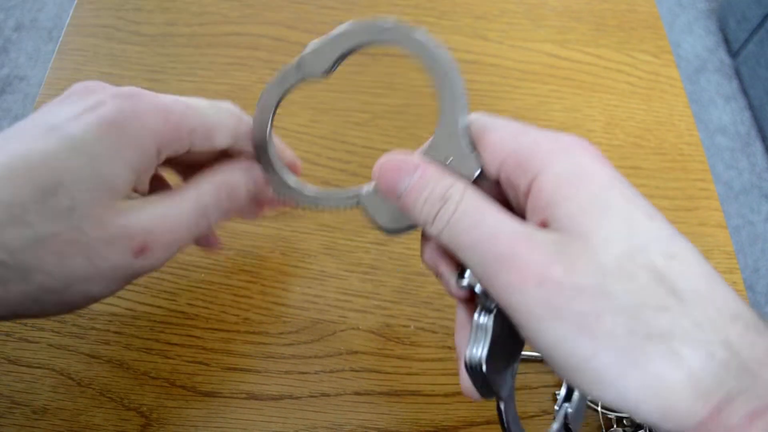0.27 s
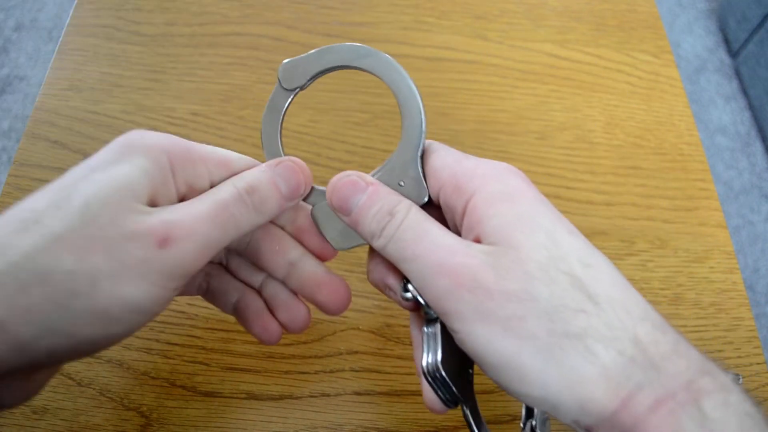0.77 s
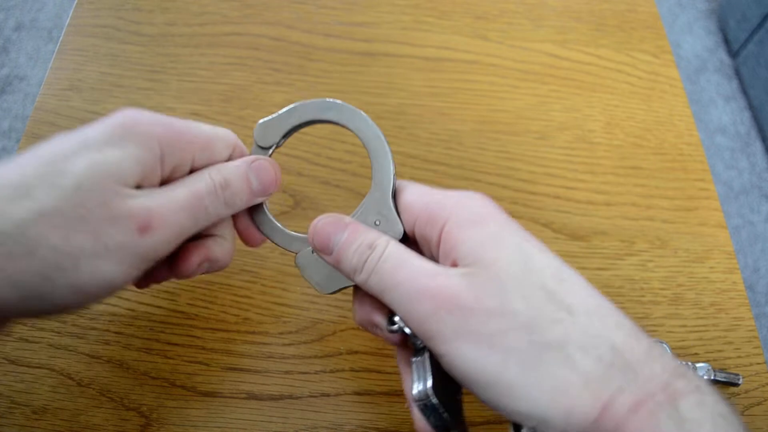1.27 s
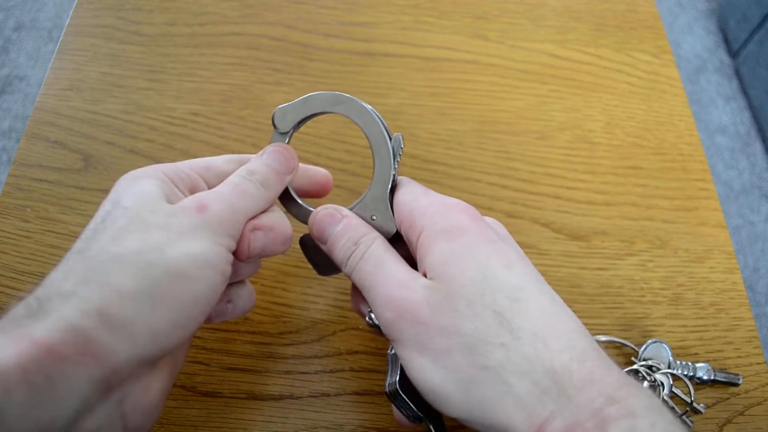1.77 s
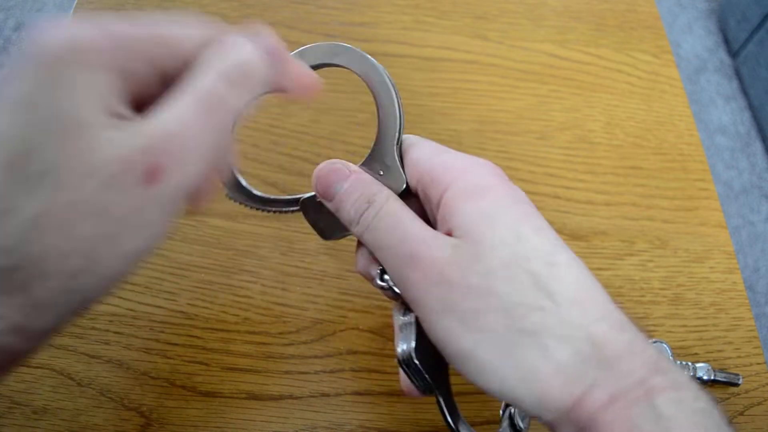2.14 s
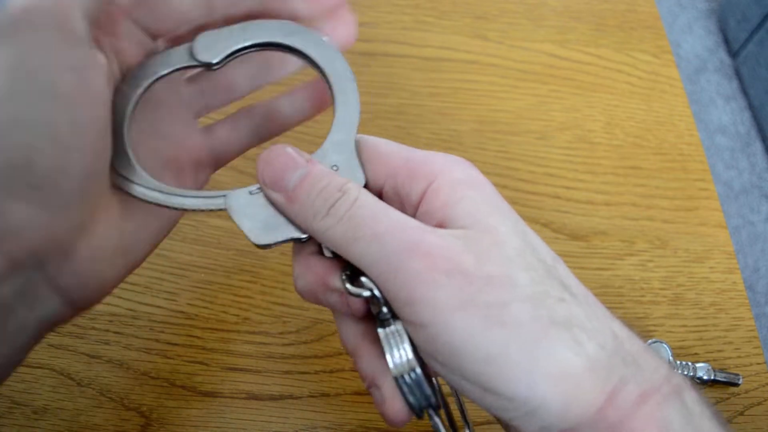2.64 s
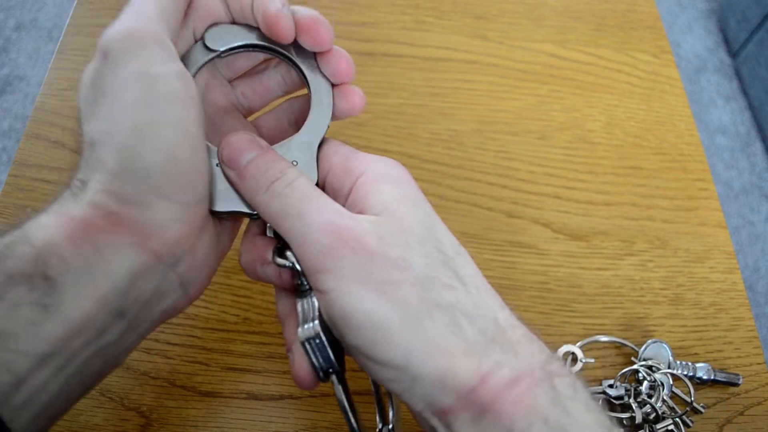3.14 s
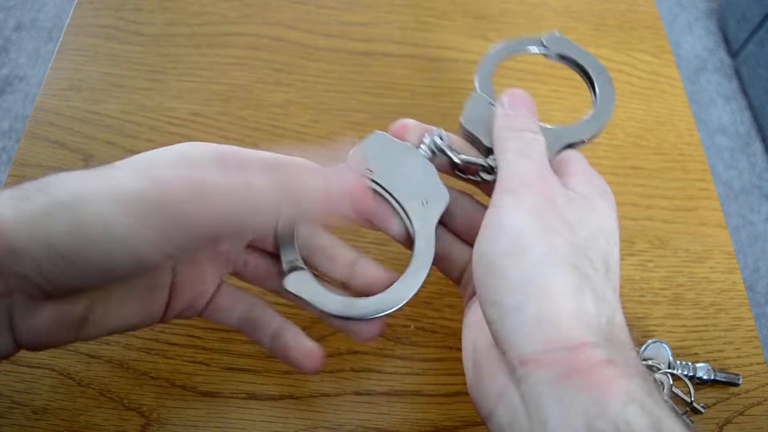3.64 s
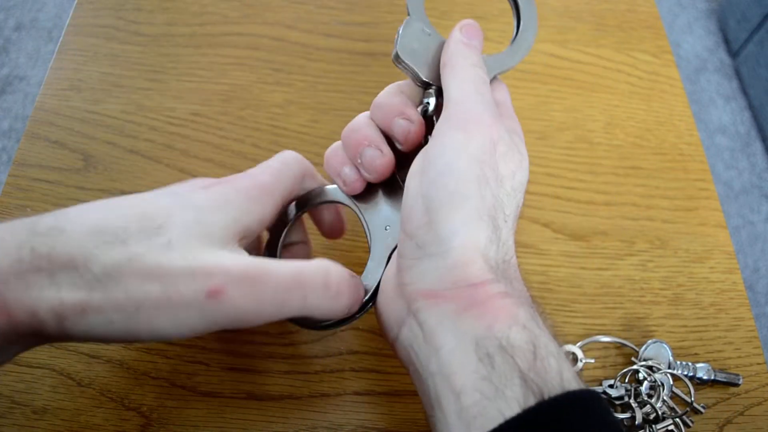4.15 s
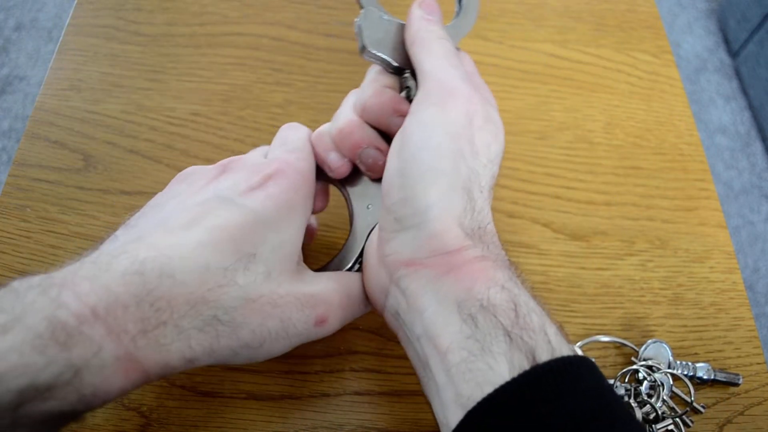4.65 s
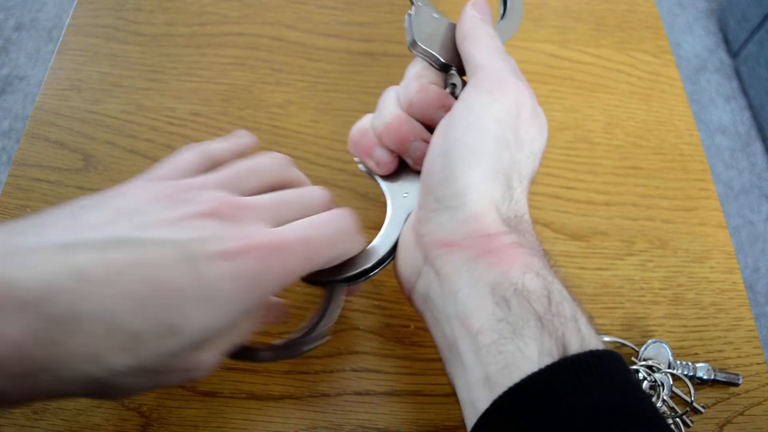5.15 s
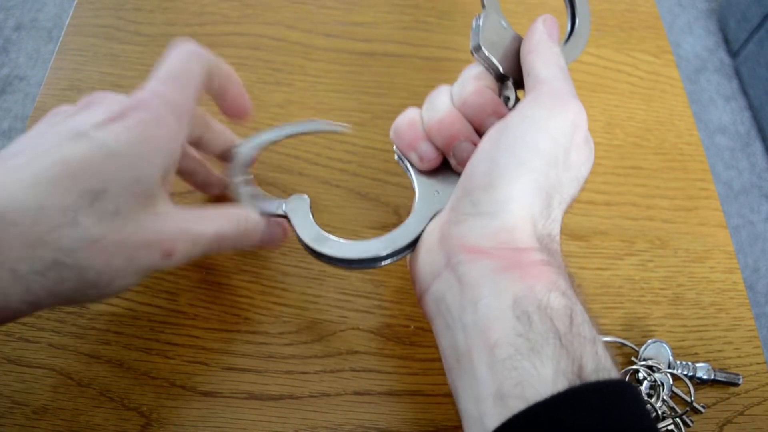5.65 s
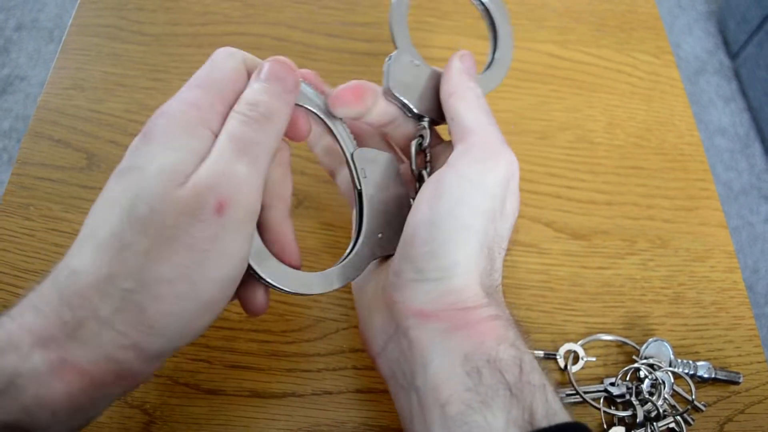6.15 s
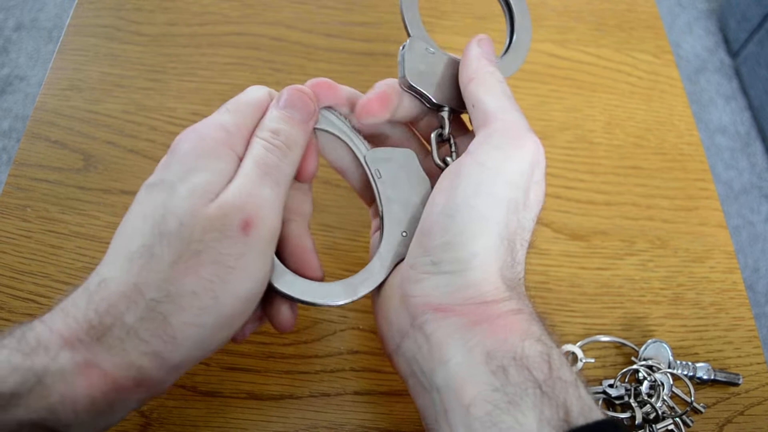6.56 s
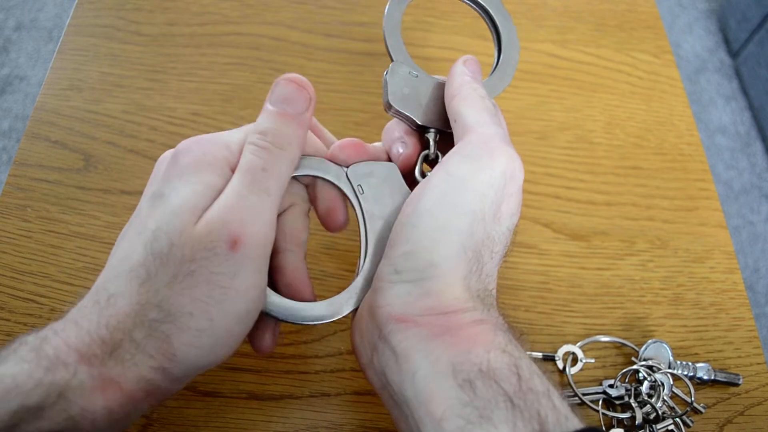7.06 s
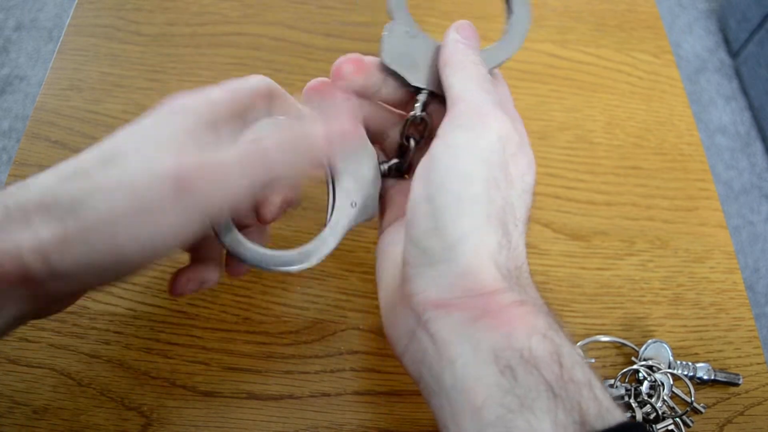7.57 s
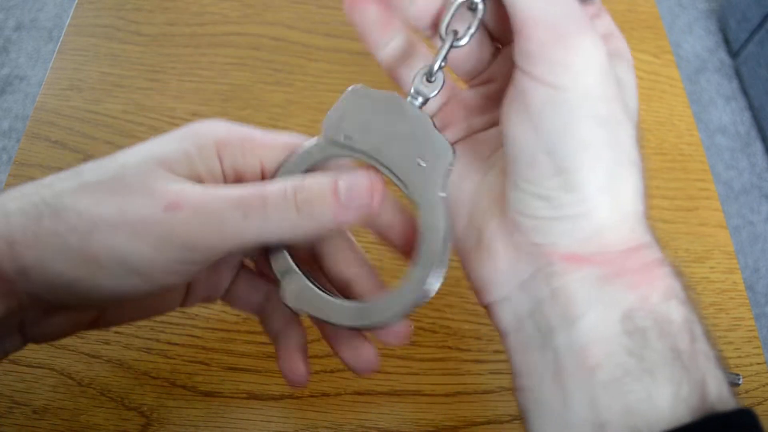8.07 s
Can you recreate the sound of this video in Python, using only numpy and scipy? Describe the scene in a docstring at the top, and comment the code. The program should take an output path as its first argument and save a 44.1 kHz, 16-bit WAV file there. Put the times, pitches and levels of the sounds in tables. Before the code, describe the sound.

A short metallic ring opens, followed by a rapid burst of ratchet clicks as a handcuff closes. Scattered clicks and a hard knock on a wooden table lead to another quick run, then two slower, uneven ones. Small clinks and chain jingles fill the gaps and finish the sound. Everything is close to the microphone, each click leaving a short tail in a quiet room with faint background noise.

```python
"""Steel handcuffs, handled close to a small microphone in a quiet, furnished room.
First the open bow hits its stop and rings briefly. From 0.6 s the pawl snaps over the bow's teeth,
in quick runs and single clicks, while links and bow clink in the hands. The wooden table takes one
hard knock at 1.9 s and four soft ones around 5.7 s. The last tooth falls at 7.1 s, then only clinks
remain. Throughout, the room answers every click with a short tail over a faint hush."""
import sys
import numpy as np
from scipy import signal
from scipy.fft import rfft, irfft
from scipy.io import wavfile
from scipy.ndimage import uniform_filter1d

SR = 44100
rng = np.random.default_rng(int(sys.argv[2]) if len(sys.argv) > 2 else 0)


def file_out(sig):
    """Save sig as 16-bit WAV at sys.argv[1]."""
    # one column per channel
    cols = np.atleast_2d(sig).T
    # limit, then scale
    lim = np.clip(cols, -1, 1)
    pcm = np.round(lim * 32767).astype(np.int16)
    wavfile.write(sys.argv[1], SR, pcm)


N = 366912

# links and bow touch: (time [s], level [dB], pitch of the part that rings most [Hz])
TOUCHES = [(0.1168, -29, 9600), (0.3362, -30, 5000), (0.3445, -33.5, 4370), (0.979, -33, 10100),
           (0.994, -34, 9100), (1.089, -48.5, 9800), (1.105, -26.5, 8250), (1.1105, -22.5, 8600),
           (1.28, -51, 9030), (1.8857, -17.5, 5000), (1.9253, -19, 9500), (2.0344, -27, 8630),
           (2.4089, -34, 4370), (2.654, -35, 10100), (2.709, -37.5, 4540), (2.754, -33.5, 9540),
           (3.2943, -21, 7760), (3.317, -31.5, 9600), (3.327, -37, 1900), (3.3618, -36, 4430),
           (3.386, -45, 6600), (3.397, -45, 4180), (3.435, -38, 9300), (3.449, -42, 3230),
           (3.536, -55, 4150), (3.56, -48, 4100), (3.5745, -39, 8780), (3.586, -23.5, 8600),
           (3.6065, -39, 9300), (3.615, -42, 9200), (3.696, -50, 9400), (3.729, -60, 6300),
           (3.7424, -28, 6560), (3.788, -45, 3180), (3.81, -41, 5600), (3.826, -30.5, 9050),
           (3.842, -45, 5600), (4.02, -39, 9110), (4.3974, -42, 8460), (5.181, -42, 8670),
           (5.227, -42, 8300), (5.239, -31.5, 8200), (5.256, -41, 8700), (5.4797, -34, 7560),
           (5.637, -47.5, 7340), (5.688, -15.5, 9360), (5.9086, -22, 9380), (5.9124, -20, 9370),
           (6.051, -44, 2900), (7.3507, -24, 10100), (7.448, -50, 9450), (7.477, -31, 10200),
           (7.488, -34.5, 10100), (7.532, -45, 9150), (7.6113, -32, 8650), (7.6425, -44, 10100),
           (7.6588, -42, 9070), (7.7513, -41, 8700), (7.7643, -45, 4180), (7.8052, -33.5, 4060),
           (7.897, -46, 9750), (7.934, -52, 9000), (7.98, -47.5, 7270), (8.0167, -53, 3150),
           (8.063, -55, 7100), (8.1544, -37.5, 1640), (8.228, -50, 3700), (8.284, -56.5, 9100)]
# modes of the cuff, damped by the hand: (frequency [Hz], width [Hz], level [dB])
CUFF_MODES = [(540, 1240, -3.5), (1160, 750, 2), (2334, 1185, -5.5), (3500, 399, -1.5), (3947, 468, 0),
              (5670, 1800, 0.5), (7240, 1910, -1.5), (8764, 410, 1), (9630, 520, 6), (10100, 2000, -2.5),
              (12700, 210, 1)]
# modes of the chain links, which ring on: (frequency [Hz], width [Hz], level [dB])
LINK_MODES = [(3230, 60, 6), (4180, 45, 8), (6590, 60, 11)]
BOW_STOP_S = 0.0772


def gain_of(db):
    """Decibels to amplitude."""
    return 10 ** (np.asarray(db) / 20)


def curve_at(points, hz):
    """Straight lines between points on a log-frequency axis."""
    point_hz, value = np.transpose(points)
    return np.interp(np.log(hz + 1), np.log(point_hz + 1), value)


def place(mix, start_s, db, sound):
    """Adds a sound so that the loudest millisecond of its first row has the given level."""
    part = mix[..., round(start_s * SR):][..., :sound.shape[-1]]
    loudest = np.sqrt(2 * uniform_filter1d(np.atleast_2d(sound)[0] ** 2, size=40).max())
    part += gain_of(db) * sound[..., :part.shape[-1]] / loudest


def chatter(noise, hold_s, t60_s, snap):
    """A hard first contact, then a few milliseconds of tiny rebounds, too light to stir the bass."""
    t = np.arange(len(noise)) / SR
    rebounds = noise - 0.3 * uniform_filter1d(noise, size=16)
    drive = rebounds * gain_of(-60 * np.maximum(t - hold_s, 0) / t60_s) * np.minimum(t / 0.001, 1)
    drive[12] -= snap
    return drive


def ring(drive, hz, width, db, steady=0):
    """A force drives a set of resonances; with steady near 1, each takes its usual share of it."""
    bin_hz, force = np.fft.rfftfreq(len(drive), 1 / SR)[:, None], rfft(drive)[:, None]
    modes = (-1) ** np.arange(len(hz)) * gain_of(db) * width / (width + 2j * (bin_hz - hz))
    excitation = np.linalg.norm(force * modes, axis=0) / np.linalg.norm(modes, axis=0)
    return irfft((force * modes / excitation ** steady).sum(axis=1), len(drive))


def strike(drive, near_modes, room_modes, steady=0):
    """Struck steel in two rows: toward the microphone, and a more even blend that fills the room."""
    near = ring(drive, *near_modes, steady)
    hz, width, db = room_modes
    even = ring(signal.unit_impulse(len(drive)), hz, 1.35 * width, db)  # modes widen toward the room
    even *= np.linalg.norm(near) / np.linalg.norm(even)
    return np.array([near, np.sqrt(0.8) * even + np.sqrt(0.2) * near])


def hush():
    """The steady background noise of room and microphone."""
    # noise spectrum: (frequency [Hz], relative density [dB])
    noise_colour = [(20, -20.5), (60, -8), (120, -2.5), (200, -1), (450, 0.5), (1250, -1.5), (1600, -6.5),
                    (2300, -10.5), (2750, -7), (3200, -14), (4700, -13.5), (6300, -22.5), (11000, -30.5)]
    colour = gain_of(curve_at(noise_colour, np.fft.rfftfreq(N, 1 / SR)))
    noise = irfft(rfft(rng.standard_normal(N)) * colour, N)
    return gain_of(-63) * noise / noise.std()


def room(sound):
    """A near wall's echo and a tail of scattered reflections, each band dying at its own speed."""
    # the near wall: (delay [s], level [dB])
    wall_echoes = [(0.012, -30)]
    # reverberation time: (frequency [Hz], t60 [s])
    decay_times = [(300, 0.42), (1300, 0.61), (3000, 0.38), (5000, .38), (9200, 0.34)]
    # colour of the tail: (frequency [Hz], relative level [dB])
    tail_colour = [(300, -14.5), (1500, -11), (2700, 0), (3700, 1.5), (7400, -1), (9500, -5.5), (11000, -1)]
    taps, grid = np.zeros((3, SR)), np.arange(240, SR - 20, 12)
    arrivals = grid + rng.integers(0, 12, (3, len(grid)))
    np.put_along_axis(taps, arrivals, rng.choice([-1., 1.], arrivals.shape), 1)
    hz, t, bands = signal.stft(taps, SR, nperseg=128)
    band_db = curve_at(tail_colour, hz)[:, None] - 60 * t / curve_at(decay_times, hz)[:, None]
    tails = signal.istft(bands * gain_of(band_db), SR, nperseg=128)[1]
    tails *= gain_of(-14.5) / np.linalg.norm(tails, axis=1, keepdims=True)
    for delay_s, db in wall_echoes:
        tails[:, round(delay_s * SR)] += gain_of(db)
    # the hands keep moving, so the paths to the walls change: three tails crossfade at 6 Hz
    turn = 2 * np.pi * (np.arange(N) * 6.0 / SR + np.arange(3)[:, None] / 3)
    crossfade = np.sqrt((1 + np.cos(turn)) / 3)
    return signal.fftconvolve(sound * crossfade, tails, axes=1)[:, :N].sum(axis=0)


def table_knocks():
    """Blows ring the wooden table top; soft ones rise slowly and reach only its lowest modes."""
    # blows on the table: (time [s], level [dB], hardness as treble slope [dB per octave])
    blows = [(1.9246, -5, 0), (5.547, -40.5, -14), (5.6, -44, -13.5), (5.769, -36.5, -22),
             (5.81, -36.5, -17)]
    # modes of the table top: (frequency [Hz], level [dB], t60 [s])
    wood_modes = [(236, -25, 0.1), (262.8, -23, 0.3), (500, -15, 0.045), (600, -11, 0.02), (812, -12, 0.11),
                  (856, -13, 0.13), (1135, -6, 0.03), (1500, -6, 0.01), (1760, -8, .025), (2240, -4, .014),
                  (2620, -15, 0.012)]
    out, t = np.zeros(N), np.arange(SR // 2) / SR
    for start_s, level_db, slope_db in blows:
        knock = np.zeros(len(t))
        for k, (hz, db, t60) in enumerate(wood_modes):
            struck_db = db + slope_db * np.log2(hz / wood_modes[1][0])
            knock += (-1) ** k * gain_of(struck_db - 60 * t / t60) * np.sin(2 * np.pi * hz * t)
        rise_s = 0.00015 - 0.00025 * min(slope_db, 0)
        place(out, start_s, level_db, knock * np.minimum(t / rise_s, 1))
    return out


def chain_jingle():
    """The chain settles around every clink in scattered faint ticks."""
    ticks_per_s, settle_s, tick_kinds = 130, 0.04, 12
    touch_s, level_db, _ = np.transpose(TOUCHES)
    stir = np.zeros(N)
    stir[np.round(touch_s * SR).astype(int)] = gain_of(np.minimum(level_db, -33) - 28)
    swell = np.exp(-abs(np.linspace(-4, 4, round(8 * settle_s * SR))))
    stir = signal.oaconvolve(stir, swell, "same")
    stir[:round(BOW_STOP_S * SR)] = 0  # nothing stirs before the bow swings
    contacts = stir * (rng.random(N) < ticks_per_s / SR)
    contacts *= gain_of(3.4 * np.minimum(rng.exponential(1, N), 4))  # a few stand out
    out, kind = np.zeros(N), rng.integers(0, tick_kinds, N)
    hz, width, db = np.transpose(CUFF_MODES[3:] + LINK_MODES)
    for k in range(tick_kinds):
        drive = chatter(rng.standard_normal(4096), hold_s=0.0005, t60_s=0.028, snap=2.4)
        tick = ring(drive, hz, 0.17 * width, db + 3.9 * rng.standard_normal(len(hz)))
        out += signal.oaconvolve(contacts * (kind == k), tick / abs(tick).max())[:N]
    return out


def clinks():
    """A light touch ticks in the cuff's modes and leaves one small part ringing, longest if a link."""
    out, (hz, width, db) = np.zeros((2, N)), np.transpose(CUFF_MODES)
    part_q = 20
    for start_s, level_db, part_hz in TOUCHES:
        drive = chatter(rng.standard_normal(4096), hold_s=0.0008, t60_s=0.009, snap=6.0)
        cuff_db = db - 11 * (hz < 2000) - 3 * (hz < 7000) + 2.5 * rng.standard_normal(len(hz))
        link_hz, link_width, link_db = min(LINK_MODES, key=lambda mode: abs(mode[0] - part_hz))
        is_link = abs(link_hz - part_hz) < 2 * link_width
        mode_hz = np.r_[hz, part_hz]
        mode_width = np.r_[width, link_width if is_link else part_hz / part_q]
        near_modes = mode_hz, mode_width, np.r_[cuff_db, 8 + link_db * is_link]
        room_modes = mode_hz, mode_width, np.r_[cuff_db, 1.5]
        place(out, start_s - 0.0003, level_db, strike(drive, near_modes, room_modes, steady=0.94))
    return out


def bow_ring():
    """The open bow hits its stop in a long, loose contact and rings until the hand catches it."""
    # modes of the free bow: (frequency [Hz], width [Hz], level [dB])
    bow_modes = [(1580, 69, -13), (2342, 95, -17), (4340, 27, -12.5), (5000, 3700, -12.5),
                 (5600, 150, -4.5), (6235, 480, -11), (8300, 6800, -18), (9860, 39, 4.5)]
    free_s, caught_decay_s = 0.028, 0.004
    out, t = np.zeros((2, N)), np.arange(8192) / SR
    hz, width, db = np.transpose(bow_modes)
    drive = chatter(rng.standard_normal(len(t)), hold_s=0.005, t60_s=0.016, snap=4.6)
    blurred_width = width + 110  # modes blur on the way round the room
    room_modes = hz, blurred_width, db + 10 * np.log10(width / blurred_width)
    caught = np.exp(-np.maximum(t - free_s, 0) / caught_decay_s)
    place(out, BOW_STOP_S, -13, strike(drive, (hz, width, db), room_modes) * caught)
    return out


def ratchet():
    """The pawl drops behind each tooth and shakes the cuff's modes, a little differently each time."""
    # drops of the pawl: (time [s], level [dB])
    teeth = [(0.604, -4), (0.6254, -6), (0.641, -7.5), (0.656, -8), (0.667, -9.5), (0.6773, -10),
             (0.687, -9.5), (0.699, -10), (0.7095, -9), (0.7197, -9.5), (0.73, -9), (0.7391, -9),
             (0.7495, -10.5), (0.7626, -10), (0.8628, -6), (1.3426, -4), (1.352, -7), (1.374, -6),
             (1.8284, -4), (1.834, -7), (1.8373, -9), (1.986, -4), (2.8025, -3), (2.8166, -7),
             (2.8288, -7.5), (2.8385, -9.5), (2.847, -11.5), (2.857, -11.5), (2.8685, -11.5), (2.8822, -11),
             (2.9016, -10.5), (2.9427, -7), (2.9967, -8), (3.0238, -7), (3.0455, -7), (3.0804, -7),
             (3.1475, -6), (4.5838, -7), (4.619, -4.5), (4.6899, -7.5), (4.7845, -6), (4.8979, -6),
             (4.9468, -5.5), (4.9714, -7), (6.386, -7), (6.3997, -6), (6.529, -4.5), (6.5805, -4.5),
             (6.6398, -6), (6.6881, -6), (6.717, -8), (6.751, -7), (6.789, -7), (6.8142, -6), (6.8602, -8),
             (6.9564, -8), (6.9937, -8), (7.1023, -7)]
    # each new grip damps the cuff differently: (start [s], upper modes [dB], middle modes [dB],
    # centre of the middle modes [Hz], 2 kHz mode [dB], lower modes [dB])
    grips = [(0.5, 0.5, 1.5, 3420, -4, -11), (0.8, 0.5, 5.5, 3320, -3.5, -2),
             (1.2, -0.5, -1, 3580, -4.5, -9.5), (1.7, 3, 4, 3500, 3.5, -1), (2.7, 0, 2.5, 3500, 1.5, -7.5),
             (4.4, 2, 5, 3590, -1, -6), (6.2, 2.5, -2.5, 3900, 0, -4.5)]
    out, (hz, width, db) = np.zeros((2, N)), np.transpose(CUFF_MODES)
    lower, near_2k, middle, upper = hz < 2000, abs(hz - 2350) < 350, abs(hz - 3700) < 800, hz > 7000
    gaps_s = np.diff(np.transpose(teeth)[0], prepend=0)
    for (start_s, level_db), gap_s in zip(teeth, gaps_s):
        grip = [row for row in grips if row[0] < start_s][-1]
        _, upper_db, middle_db, middle_hz, near_2k_db, lower_db = grip
        lower_db -= 2 / (1 + (gap_s / 0.006) ** 2)  # a tooth that follows quickly lands lightly
        held_hz = np.where(middle, hz * middle_hz / hz[middle].mean(), hz)
        held_db = db + upper_db * upper + middle_db * middle + near_2k_db * near_2k + lower_db * lower
        drive = chatter(rng.standard_normal(2048), hold_s=0.0015, t60_s=0.0076, snap=10.0)
        detune, scatter = rng.standard_normal((2, len(hz)))
        near_modes = held_hz * (1 + 0.038 * detune), width, held_db + 1.5 * scatter
        # the middle modes carry best into the room
        room_modes = held_hz * (1 + 0.035 * detune), width, held_db + 5.5 * middle + 2.5 * scatter
        click = strike(drive, near_modes, room_modes, steady=0.8)  # the teeth are cut alike
        place(out, start_s - 0.0004, level_db, click)
    return out


def scene():
    """Cuffs and table in mono, close up and through the room, over the hush."""
    cuffs_near, cuffs_spread = ratchet() + bow_ring() + clinks() + chain_jingle()
    table = table_knocks()
    # the table's knocks reach the room more strongly than the cuffs do
    reverb = room(cuffs_spread + gain_of(7) * table)
    return (cuffs_near + table + reverb + hush())[None]


def soften(sound, ceiling, knee):
    """A soft knee that flattens peaks near the ceiling."""
    return sound / (1 + abs(sound / ceiling) ** knee) ** (1 / knee)


def record(dry):
    """The recorder rounds the loudest peaks, loses the top treble, tops out and limits the band."""
    # response of microphone and recorder: (frequency [Hz], gain [dB])
    mic_response = [(60, -8.5), (200, -1), (10300, 3), (11200, -4.5), (11700, -14.5), (12100, -34.5),
                    (13000, -21.5), (14000, -36), (16500, -38.5)]
    hz = np.linspace(0, SR / 2, 2049)
    power = gain_of(2 * curve_at(mic_response, hz))  # minimum_phase takes the square root
    mic_filter = signal.minimum_phase(signal.firwin2(2047, hz, power, fs=SR))
    rounded = soften(dry, ceiling=0.54, knee=2.6)
    coloured = signal.oaconvolve(rounded, mic_filter[None])[:, :N]
    limited = soften(coloured, ceiling=0.8, knee=12.0)
    band_limit = signal.firwin(511, 16700, window=("kaiser", 9), fs=SR)
    return signal.oaconvolve(limited, band_limit[None], "same")


dry = scene()
out = record(dry)
file_out(out)
```